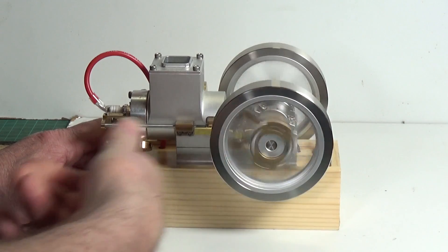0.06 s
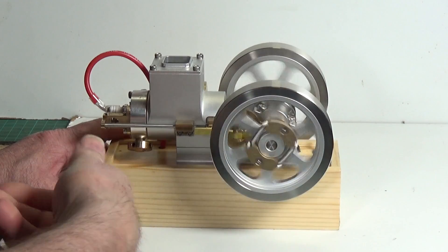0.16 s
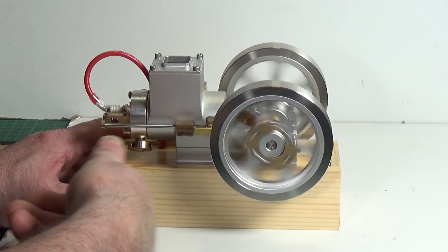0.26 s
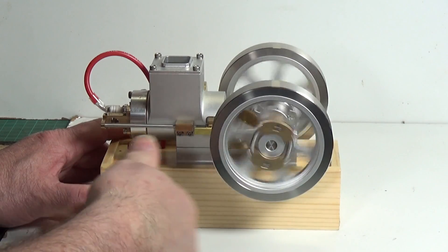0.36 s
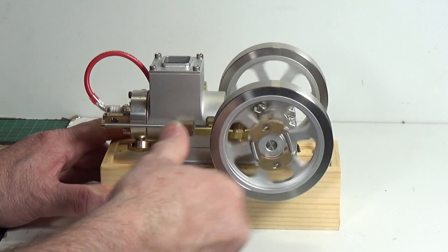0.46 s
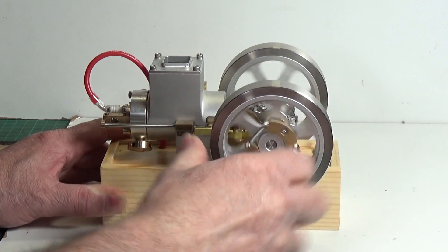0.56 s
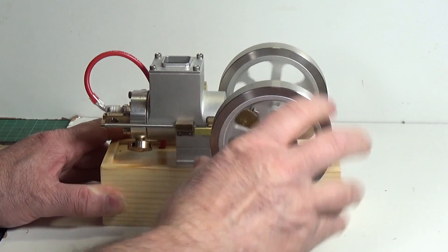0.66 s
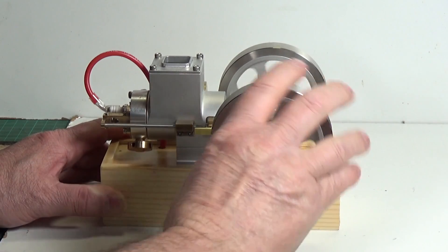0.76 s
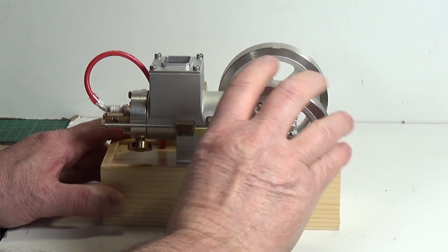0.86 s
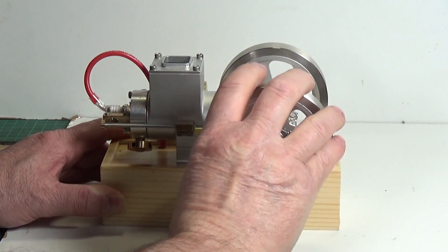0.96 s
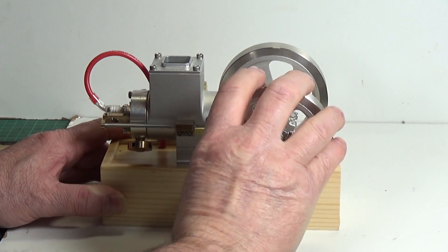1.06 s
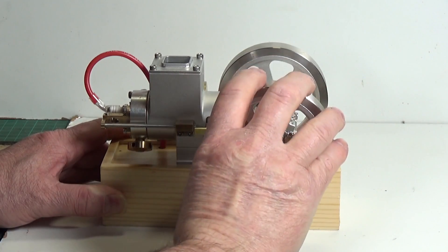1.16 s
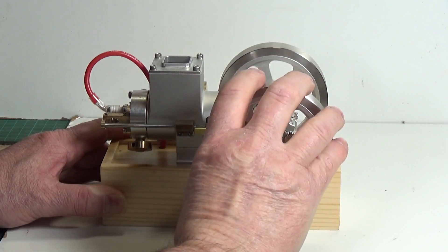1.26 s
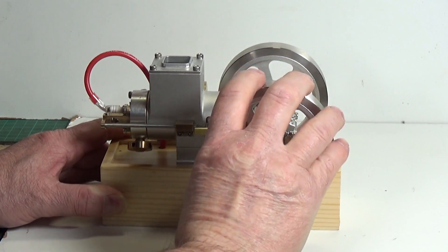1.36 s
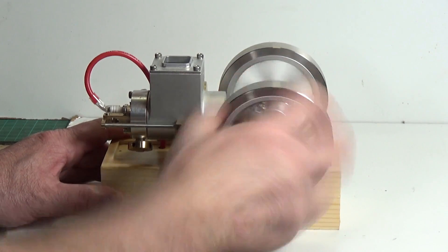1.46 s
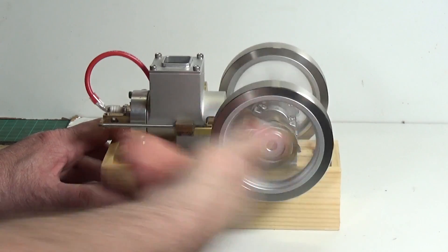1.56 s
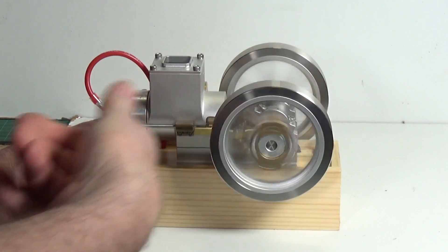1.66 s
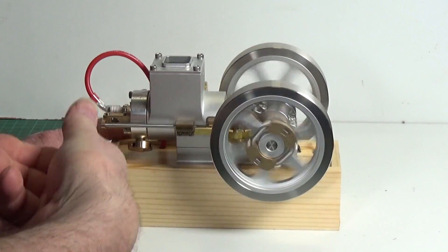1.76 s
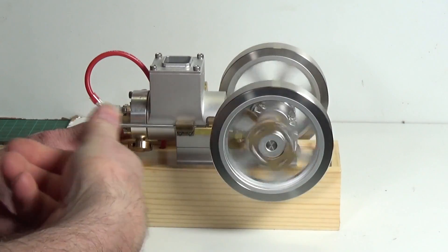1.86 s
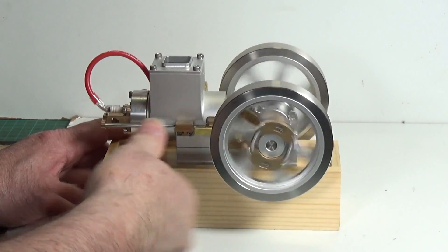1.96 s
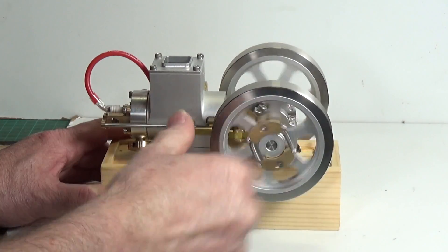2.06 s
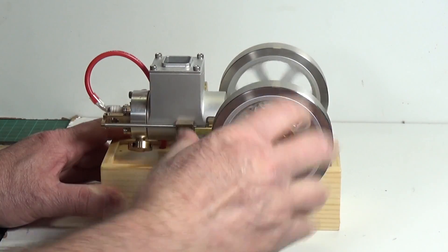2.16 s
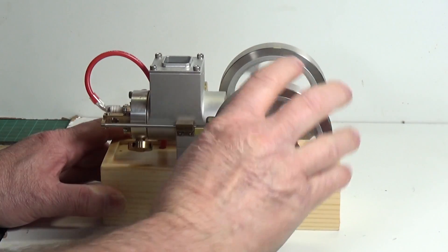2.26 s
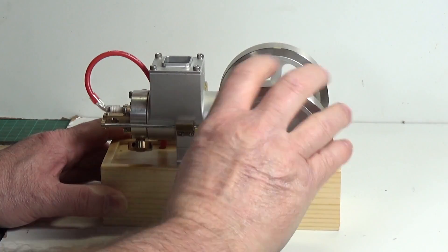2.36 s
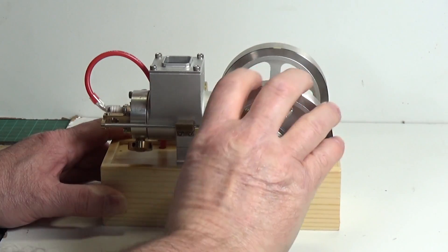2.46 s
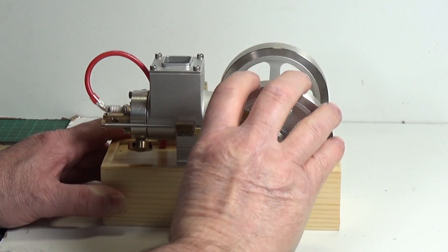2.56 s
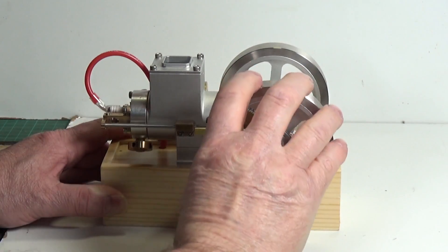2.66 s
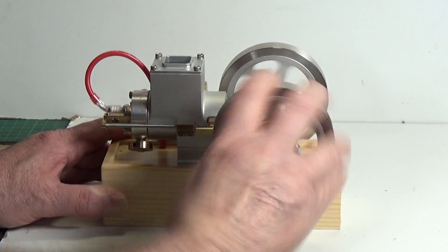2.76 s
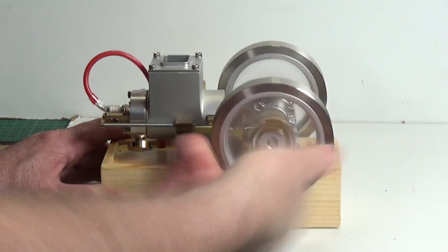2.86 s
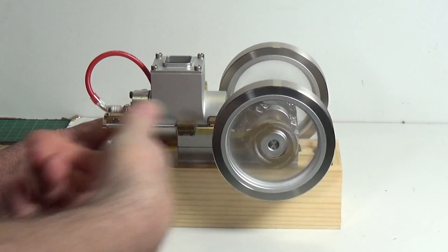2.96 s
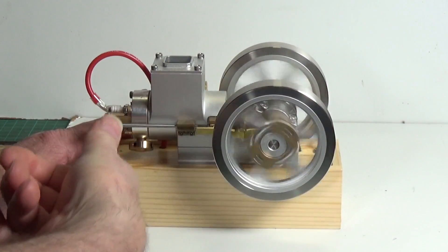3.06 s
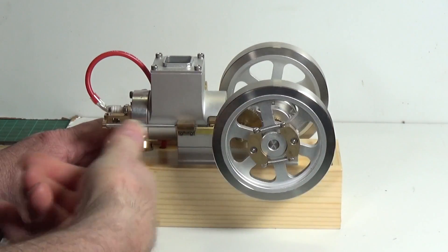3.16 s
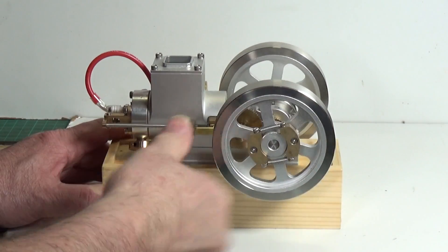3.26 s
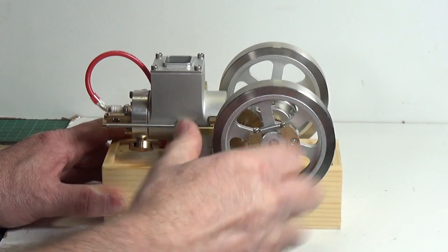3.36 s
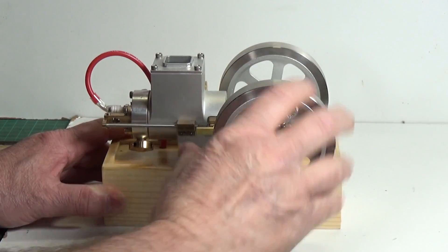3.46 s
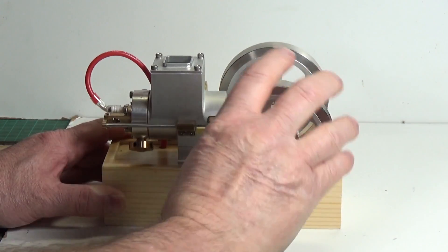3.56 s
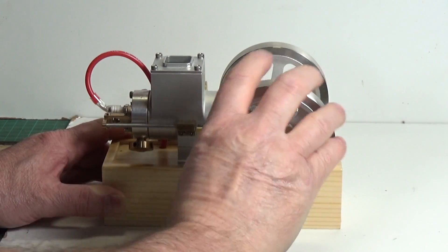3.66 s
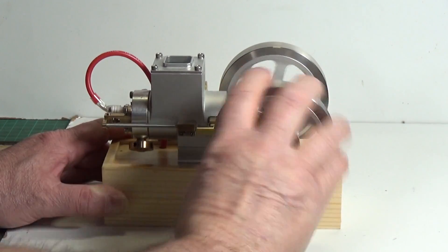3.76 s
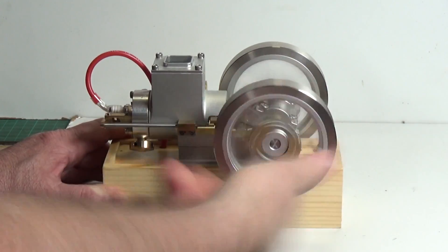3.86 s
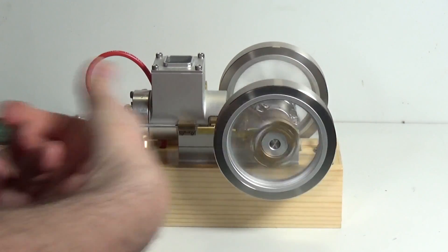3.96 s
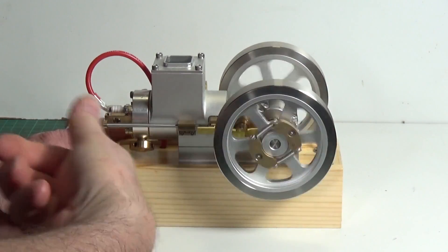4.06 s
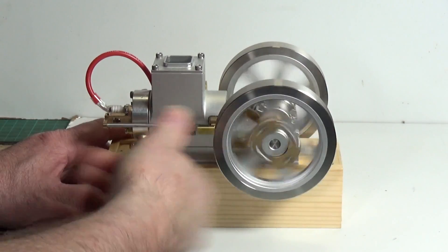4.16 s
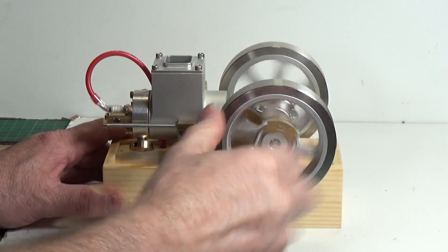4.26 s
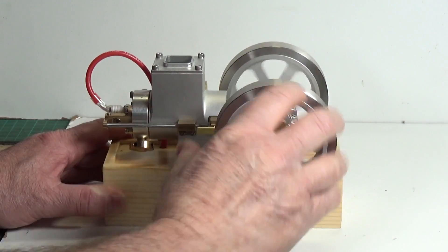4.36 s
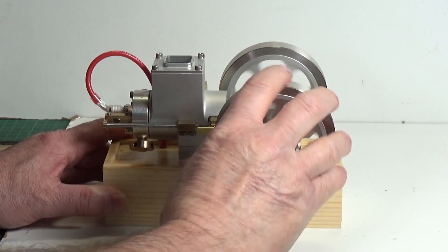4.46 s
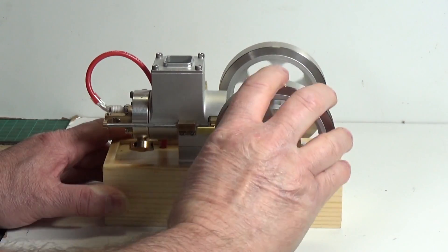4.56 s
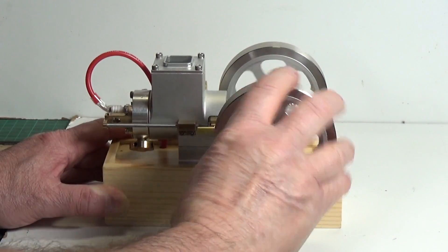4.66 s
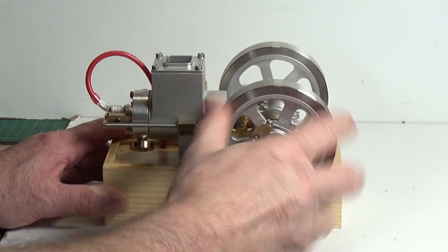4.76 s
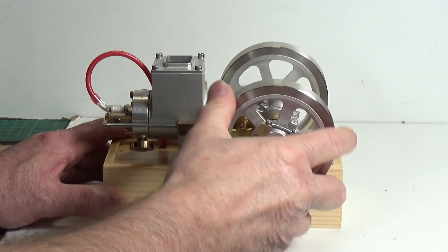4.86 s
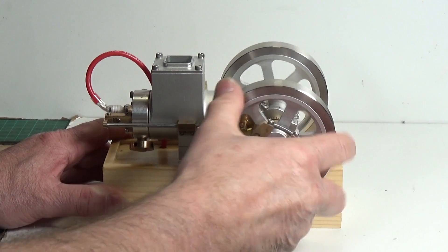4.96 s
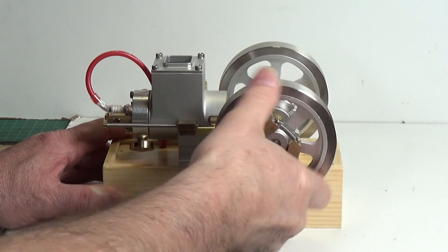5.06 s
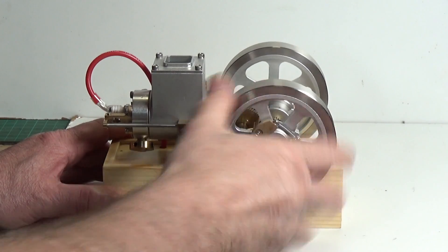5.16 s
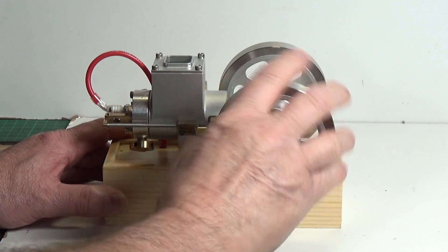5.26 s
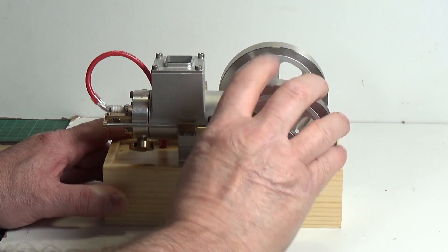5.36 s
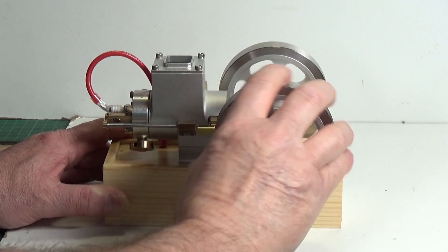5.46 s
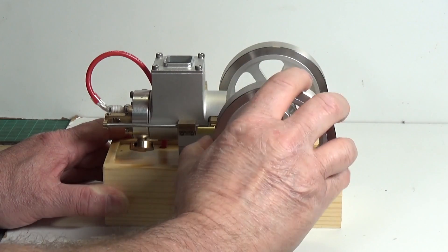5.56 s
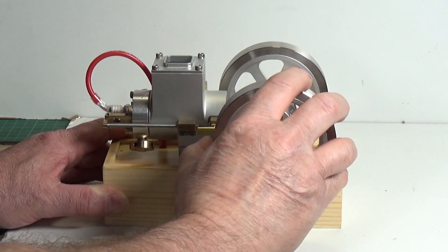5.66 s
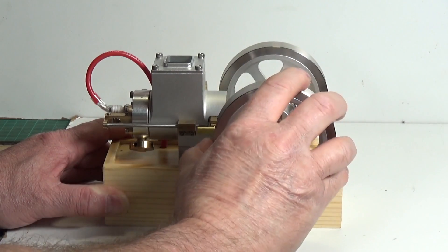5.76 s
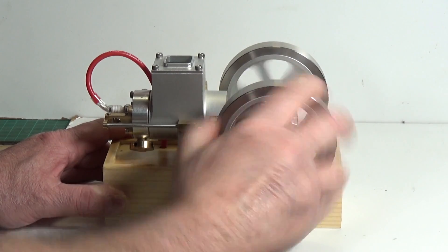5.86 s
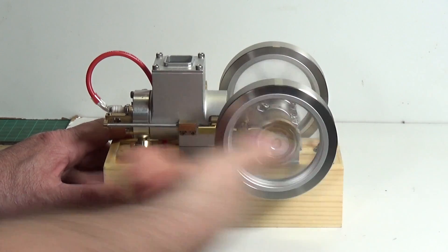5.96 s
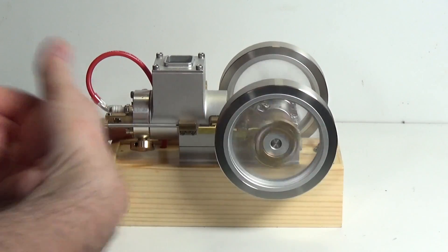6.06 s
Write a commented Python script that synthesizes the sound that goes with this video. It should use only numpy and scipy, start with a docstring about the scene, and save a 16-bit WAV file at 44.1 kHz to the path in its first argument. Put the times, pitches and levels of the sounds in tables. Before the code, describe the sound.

A small metal model engine on a wooden block is flicked over by hand again and again, each spin a short burst of knocks, clatter and valve buzz.

```python
"""A knock through a wooden box opens the rattle of a small model engine, spun by hand on its flywheel in a quiet room.
Random impacts of gear teeth and bearings ring the box and frame; cam and valve gear tick as struck resonances.
The inlet valve flutters as a buzzing tone with puffs of noise, and trapped air leaks away as resonant hiss.
Fingers scuff the wheel, whose rim sings faintly in beating sines; a low hum comes and goes under a thin whine."""
import sys
import numpy as np
from scipy import signal
from scipy.fft import rfft, irfft, next_fast_len
from scipy.io import wavfile
from scipy.ndimage import uniform_filter1d, map_coordinates

SR = 44100
rng = np.random.default_rng(int(sys.argv[2]) if len(sys.argv) > 2 else 0)


def wav_record(signal):
    """Record a signal, one row per channel, as 16-bit PCM in the file named by sys.argv[1]."""
    frames = np.transpose(np.atleast_2d(signal))
    bounded = np.clip(frames, -1, 1)
    # unit amplitude maps onto the largest positive 16-bit level
    quanta = np.round(bounded * 32767).astype(np.int16)
    wavfile.write(sys.argv[1], SR, quanta)


def undo_db(level):
    """Turn decibels back into plain size, where 20 dB means ten times bigger."""
    steps = np.asarray(level, float) / 20
    return 10 ** steps


N = 269451
TIME = np.arange(N) / SR  # seconds

# resonances of the wooden box: pitch_hz, width_hz, level_db
BOX_MODES = [(49.6, 22, -29), (132, 55, -4), (211.6, 59, -2), (248.4, 47.5, 3), (293.5, 52, -0.5),
             (411, 124, -4.5), (569, 94, 1), (637.5, 154.6, -1.5), (900, 116, -7), (988, 95, -7)]
# resonances of the metal frame: pitch_hz, width_hz, level_db
FRAME_MODES = [(1290, 100, 4), (1448, 210, 2), (1815, 213, 5.5), (1988, 295, 4.5), (2340, 520, 2),
               (2820, 1310, -3), (3700, 4100, -15)]
# colour of the air hiss at the valves: pitch_hz, relative level_db (per Hz)
HISS_COLOUR = [(2060, -7), (3500, 3), (4230, -3.5), (4820, -1), (7720, -5), (9380, -2.5), (14600, -21.5),
               (15700, -2.5)]

# spins, each playing the same cycle: valve_opens_s, slowness (1 = usual), strength_db, wheel_stopped_after_s (cycle time)
SPINS = [(0.0755, 0.998, -1, 0.6), (1.6868, 0.975, 0, 0.6), (3.0012, 0.89, 1, 0.1),
         (3.9705, 1.005, 0.5, 0.6), (6.0752, 0.95, 0.5, 0.03)]
# The cycle tables hold times at slowness 1 and levels at strength 0 dB.
# valve gear in the cycle: after_opening_s, tick_db, tick_colour_hz, frame_clack_db
CYCLE_CLICKS = [(-0.013, -16.5, 9300, -20), (0.0, -23, 6040, -13.5), (0.072, -20.5, 7650, -10),
                (0.232, -26.5, 6400, -18), (0.256, -24.5, 6500, -38), (0.311, -27.5, 6350, -17),
                (0.498, -50, 6200, -19.5)]
# knocks through the box in the cycle: after_opening_s, level_db, colour_hz
CYCLE_THUDS = [(0.071, -9, 394), (0.229, -14.5, 368), (0.315, -19, 266), (0.491, -20.5, 500)]
# ever weaker surges of the coasting wheel: after_opening_s, rise_s, length_s, box_db, frame_db
CYCLE_SURGES = [(0.184, 0.044, 0.21, -23.5, -37), (0.454, 0.037, 0.09, -32, -49)]
# inlet stroke of the cycle: after_opening_s (never stretched), length_s, buzz_db, puff_db
CYCLE_INTAKE = (0.006, 0.043, -9, -31.5)

# the hand throws or nudges the wheel: start_s, rise_s, length_s, box_db, frame_db
HAND_SURGES = [(0.0, 0.0023, 0.19, -19.5, -26), (0.69, 0.026, 0.22, -40.5, -70),
               (1.46, 0.14, 0.35, -12.5, -25.5), (2.27, 0.036, 0.16, -35.5, -52.5),
               (2.8, 0.12, 0.32, -13, -25), (3.83, 0.048, 0.26, -14.5, -25),
               (4.67, 0.025, 0.11, -43.5, -70), (4.9, 0.085, 0.43, -37, -56), (5.89, 0.12, 0.3, -15, -23)]
# other clicks of rod, gears and slack: start_s, tick_db, tick_colour_hz, frame_clack_db
OTHER_CLICKS = [(0.0509, -37, 5600, -18), (0.8612, -49, 7900, -44), (1.4212, -48, 10200, -40),
                (1.5399, -20, 9200, -18), (1.5695, -27, 8100, -13.5), (1.5883, -23, 5100, -13.5),
                (1.5978, -18, 5360, -5), (1.6204, -27, 6150, -11.5), (2.2257, -40, 9800, -37),
                (2.777, -25.5, 5050, -23.5), (2.8707, -20.5, 8600, -37), (2.8898, -25, 8130, -16.5),
                (2.9178, -28, 6800, -10.5), (2.9319, -31, 5600, -6), (3.1205, -26.5, 7860, -23),
                (3.8541, -22, 7040, -2.5), (3.8628, -17, 6300, -36), (3.8857, -22, 6100, -22),
                (3.898, -28, 6560, -6.5), (3.9193, -36, 5700, -12.5), (4.1145, -30.5, 9200, -40),
                (4.8345, -33, 8650, -32), (5.1718, -18.5, 4600, -20), (5.1844, -24.5, 5060, -33),
                (5.453, -30, 5860, -43), (5.885, -53, 5200, -33), (5.9585, -21, 13000, -18),
                (6.018, -7, 10530, -10.5), (6.0348, -14, 7740, -4), (6.0924, -8, 15000, -16)]
# other thuds through the wooden box: start_s, level_db, colour_hz
OTHER_THUDS = [(0.004, -5, 570), (0.207, -17.5, 474), (0.265, -21, 387), (0.286, -16, 730),
               (0.722, -28, 565), (0.772, -27, 302), (0.907, -20.5, 296), (1.117, -33.5, 570),
               (1.42, -24, 228), (1.511, -18.5, 600), (1.548, -1, 610), (1.59, -6, 746), (1.597, 0, 420),
               (1.895, -21, 641), (1.94, -22, 300.5), (2.031, -18.5, 246.8), (2.284, -24, 315),
               (2.318, -23, 293), (2.454, -24, 264), (2.775, -26, 416), (2.868, -11.5, 620),
               (2.906, -1.5, 635), (2.933, -8.5, 556), (2.983, -10, 260), (3.899, -3.5, 621),
               (4.684, -28, 272), (4.847, -18.5, 560), (5.158, -13.5, 305), (5.214, -25, 570),
               (5.445, -10.5, 603), (5.883, -12.5, 276), (5.955, -12, 580), (6.022, -2.5, 577)]
# inlet strokes while the hand still pulls: start_s, length_s, buzz_db, puff_db
HAND_INTAKES = [(2.802, 0.059, -60, -33), (3.858, 0.039, -12.5, -33), (5.95, 0.04, -44, -28.5)]
# faint box rattle between the surges: time_s, level_db
IDLE_RATTLE = [(0.0, -29), (0.85, -52.5), (1.05, -54), (1.4, -55), (1.6, -30), (2.3, -39.5), (2.72, -47),
               (3.2, -41.5), (3.75, -45), (4.3, -37), (4.62, -49), (5.0, -40.5), (5.85, -44.5), (6.11, -50)]

# colour of the inlet puff: pitch_hz, relative level_db (per Hz)
PUFF_COLOUR = [(2060, -34), (3500, -6), (5860, -3.5), (6400, -6), (8170, -10), (9260, 1), (11400, -8),
               (15700, -3)]
# the rim's close pair of modes: lower pitch_hz, upper pitch_hz
RIM_PAIR_HZ = [4695, 4730]
# the rim's high modes: pitch_hz, relative level_db
RIM_HIGH_MODES = [(8140, -2), (11553, -7), (12898, 0)]
# rim set ringing, then damped: start_s, end_s, lower_of_pair_db, upper_of_pair_db, high_modes_db
RIM_RINGS = [(0, .225, -42, -40, -72), (.255, .62, -60, -45, -78), (.645, 1, -72, -59, -86),
             (1.545, 1.69, -52, -46, -56), (2.355, 2.51, -64, -60, -67), (2.88, 2.96, -52, -49, -72),
             (3.92, 3.96, -52, -49, -72), (4.015, 4.19, -55, -46, -70), (4.25, 4.55, -63, -59, -80),
             (4.74, 5.0, -70, -66, -78), (5.07, 5.17, -53, -54, -65), (5.19, 5.4, -64, -61, -69),
             (5.965, 6.11, -39, -34, -54)]
# fingers brush the wheel: start_s, level_db, scuff_decay_s
TOUCHES = [(0.8945, -36, 0.041), (1.467, -34, 0.14), (2.628, -33.5, 0.063), (3.219, -37, 0.042),
           (3.797, -32, 0.051), (4.39, -35, 0.038), (4.957, -33.5, 0.02), (5.549, -36, 0.076)]
# leaks of trapped air: start_s, end_s, lower_resonances_db, upper_resonances_db
LEAKS = [(3.13, 3.852, -45, -49), (5.373, 5.85, -52.5, -64)]
# lower resonances of the leaking gap: pitch_hz, width_hz, relative level_db
GAP_LOW_MODES = [(1930, 380, 2.5), (6400, 3200, -16.5), (8460, 160, -5)]
# upper resonances of the leaking gap: pitch_hz, width_hz, relative level_db
GAP_HIGH_MODES = [(9360, 250, 10), (10900, 250, 5), (11900, 300, 1), (14100, 250, 3), (15000, 250, -2)]

# time for the room's answer to die by 60 dB: pitch_hz, decay_s
ROOM_DECAY = [(150, 0.38), (1000, 0.09), (4000, 0.12), (14000, 0.039)]
# colour of the room tone: pitch_hz, relative level_db (per Hz)
QUIET_COLOUR = [(15, -36), (25, 8), (53, -21), (119, 12), (342, -21), (424, -17), (485, -49), (746, -6),
                (809, -35), (901, -44), (2080, -17), (3470, -25), (15700, -26.5)]
# course of the low hum: time_s, level_db
HUM_LEVEL = [(0.0, -64), (0.46, -54), (0.92, -46), (1.48, -57), (1.77, -42), (2.86, -39), (3.03, -32.5),
             (3.33, -32.5), (3.66, -43.5), (5.53, -55.5), (6.11, -43)]

# Shape of a surge; the release adds to the sag.
RISE_DB, SAG_DB_PER_S, RELEASE_DB_PER_S = 24, 54.5, 367
# The valve hiss swings wider than the frame and lingers.
AIR_DB, AIR_DB_PER_FRAME_DB, AIR_RELEASE_DB_PER_S = 5, 1.5, 63
# Every thud leaves box and frame rattling briefly: box against the thud, fall, frame against the box.
SHAKE_DB, SHAKE_DB_PER_S, SHAKE_FRAME_DB = -12, 214, -19
# Idle frame against idle box; idle hiss offset and its dB per dB of box rattle.
IDLE_FRAME_DB, IDLE_AIR_DB, IDLE_AIR_FOLLOWS = -11, -43, 0.37
CLACK_HZ, CLACK_DB_PER_OCTAVE = 2160, -5.5  # a clack favours the frame modes near this pitch
FLUTTER_HZ = 209.7  # at the start of a stroke
RING_DB_PER_S = 30
SQUEAK_HZ = 2225
LEAK_LOW_DB_PER_S, LEAK_HIGH_DB_PER_S = 10.5, 50
QUIET_DB = -50
WHINE_HZ, WHINE_DB = 15640, -76
TOP_HZ = 15800


def running():
    """Teeth and bearings shake box and frame; jingle follows the square of the frame gain; air hisses at the valves."""
    box, frame, air, faint = shaking()
    teeth = chatter(rate=250, spread_db=3.5, smooth=0.71, size=24)
    slack = chatter(rate=350, spread_db=3.5, smooth=0.5, size=7)
    loose = chatter(rate=370, spread_db=18, smooth=0.2, size=3)
    wood = box * undo_db(0.8 * wobble(30)) * unit(resonant(teeth, BOX_MODES))
    metal = frame * undo_db(1.2 * wobble(40)) * unit(resonant(slack + 0.43 * teeth, FRAME_MODES))
    loose_ring = resonant(loose, [(4670, 1400, -0.76), (6400, 1300, 2.9), (9200, 320, -2.3)])
    jingle = frame ** 2 * undo_db(13.5) * unit(loose_ring)
    valve_hiss = air * undo_db(wobble(54)) * patchy(coloured(HISS_COLOUR), patchy_db=5.5)
    return wood + metal + jingle + valve_hiss + faint * coloured(HISS_COLOUR)


def shaking():
    """Gains of box rattle, frame rattle, valve hiss and the faint even hiss under it, summed as powers."""
    _, knocks, surges, _ = cycles()
    idle_db = np.interp(TIME, *np.transpose(IDLE_RATTLE))
    box, frame, air = undo_db(idle_db), undo_db(idle_db + IDLE_FRAME_DB), np.zeros(N)
    for start, rise, length, box_db, frame_db in surges:
        peak, end = start + rise, start + length
        shape = surge(start, peak, end, RELEASE_DB_PER_S)
        box = np.hypot(box, undo_db(box_db + shape))
        frame = np.hypot(frame, undo_db(frame_db + shape))
        air_shape = surge(start, peak, end, AIR_RELEASE_DB_PER_S)
        air = np.hypot(air, undo_db(AIR_DB + AIR_DB_PER_FRAME_DB * frame_db + air_shape))
    for start, level_db, _ in knocks:
        fall_db = SHAKE_DB_PER_S * np.abs(TIME - start)
        shake = (TIME > start) * undo_db(level_db + SHAKE_DB - fall_db)
        box = np.hypot(box, shake)
        frame = np.hypot(frame, undo_db(SHAKE_FRAME_DB) * shake)
    return box, frame, air, undo_db(IDLE_AIR_FOLLOWS * idle_db + IDLE_AIR_DB)


def surge(start, peak, end, release):
    """dB shape of a burst of motion: a rise to the peak, a slow sag, then a release."""
    rise = RISE_DB * np.minimum(TIME - peak, 0) / (peak - start)
    lead_in = RELEASE_DB_PER_S * np.maximum(start - TIME, 0)
    sag = SAG_DB_PER_S * np.maximum(TIME - peak, 0)
    return rise - lead_in - sag - release * np.maximum(TIME - end, 0)


def cycles():
    """The engine cycle's clicks, thuds, surges and inlet strokes laid out for every spin, with the other events."""
    ticks, knocks = list(OTHER_CLICKS), list(OTHER_THUDS)
    surges, intakes = list(HAND_SURGES), list(HAND_INTAKES)
    intake_after, intake_length, buzz_db, puff_db = CYCLE_INTAKE
    for opens, slow, db, stop in SPINS:
        for after, tick_db, hz, clack_db in CYCLE_CLICKS:
            if after < stop:
                ticks.append((opens + slow * after, tick_db + db, hz, clack_db + db))
        for after, level_db, hz in CYCLE_THUDS:
            if after < stop:
                knocks.append((opens + slow * after, level_db + db, hz))
        for after, rise, length, box_db, frame_db in CYCLE_SURGES:
            if after < stop:
                surges.append((opens + slow * after, slow * rise, slow * length, box_db + db, frame_db + db))
        intakes.append((opens + intake_after, slow * intake_length, buzz_db + db, puff_db + db))
    return ticks, knocks, surges, intakes


def thuds():
    """Soft blows ring the box; the spot struck favours the modes near its pitch."""
    out, t = np.zeros(N + SR), np.arange(SR // 5) / SR
    mode_hz = np.transpose(BOX_MODES)[0]
    for start, level_db, hz in cycles()[1]:
        burst = rng.standard_normal(len(t)) * undo_db(-60 * t / 0.005)
        force = np.convolve(burst, np.hanning(32))[:len(t)]
        favour_db = -9 * abs(np.log2(mode_hz / hz))
        out[round(start * SR):][:len(t)] += undo_db(level_db) * struck(BOX_MODES, favour_db, force)
    return out[:N]


def clicks():
    """Metal on metal: a bright tick, and a clack in the frame with a short rattle behind it."""
    out, t = np.zeros(N + SR), np.arange(SR // 8) / SR
    favour_db = CLACK_DB_PER_OCTAVE * abs(np.log2(np.transpose(FRAME_MODES)[0] / CLACK_HZ))
    for start, tick_db, tick_hz, clack_db in cycles()[0]:
        noise = rng.standard_normal(len(t))
        tick_force = noise * (undo_db(-60 * t / 0.0079) + 0.22 * undo_db(-60 * t / 0.06))
        tick = resonant(tick_force, [(tick_hz, 500, 0), (10000, 10000, -11)])
        burst = noise * (undo_db(-60 * t / 0.017) + 0.43 * undo_db(-60 * t / 0.065))
        force = np.convolve(burst, np.hanning(9))[:len(t)]
        uneven_db = 3.3 * noise[:len(FRAME_MODES)]  # each clack excites the modes differently
        clack = struck(FRAME_MODES, favour_db + uneven_db, force)
        out[round(start * SR):][:len(t)] += undo_db(tick_db) * tick / np.abs(tick).max() + undo_db(clack_db) * clack
    return out[:N]


def struck(modes, favour_db, force):
    """A blow of peak 1 that favours some modes over others."""
    ring = resonant(force, [(hz, w, db + more) for (hz, w, db), more in zip(modes, favour_db)])
    return ring / np.abs(ring).max()


def flutter():
    """The spring-loaded inlet valve buzzes on its seat while air is drawn past it."""
    buzz, draught = np.zeros(N + SR), np.zeros(N + SR)
    for start, length, buzz_db, puff_db in cycles()[3]:
        t = np.arange(round(3 * length * SR)) / SR
        turn = 2 * np.pi * FLUTTER_HZ * t * (1 - 0.11 * t)  # slows through the stroke
        rise = 1 - np.exp(-t / 0.009)
        tone = np.sin(turn) + 0.43 * np.sin(2 * turn + 0.23) + 0.073 * np.sin(3 * turn + 0.97)
        buzz[round(start * SR):][:len(t)] += undo_db(buzz_db) * rise * np.exp(-(t / (0.83 * length)) ** 3) * tone
        puff = rise * np.exp(-(t / length) ** 5) * (1 + 0.22 * np.sin(turn))
        draught[round(start * SR):][:len(t)] += undo_db(puff_db) * puff
    return buzz[:N] + draught[:N] * patchy(coloured(PUFF_COLOUR), patchy_db=7.0)


def touches():
    """Skin drags briefly on metal: a soft scuff that opens with a short squeak."""
    out, t = np.zeros(N + SR), np.arange(SR // 4) / SR
    for start, level_db, decay in TOUCHES:
        squeak = resonant(rng.standard_normal(len(t)), [(SQUEAK_HZ, 220, 0)])
        squeak = unit(resonant(squeak, [(SQUEAK_HZ, 600, 0)])) * np.exp(-t / 0.02)
        scuff = resonant(rng.standard_normal(len(t)), [(1679, 1060, 0)])
        scuff = 0.6 * unit(resonant(scuff, [(1704, 1200, 0)])) * np.exp(-t / decay)
        rise = 1 - np.exp(-t / 0.0047)
        out[round(start * SR):][:len(t)] += undo_db(level_db) * rise * (squeak + scuff)
    return out[:N]


def rim():
    """The rim's long modes sing when rubbed or knocked; the close pair beats."""
    level = np.zeros((3, N))
    for start, end, *mode_db in RIM_RINGS:
        age = np.clip(TIME - start, 0, None)
        attack = np.clip(age / 0.0021, 0, 1)
        damping = np.clip((end - TIME) / 0.0086 + 1, 0, 1)
        level += undo_db(mode_db)[:, None] * undo_db(-RING_DB_PER_S * age) * attack * damping

    def mode(hz):
        """A sine unsteady in level and phase."""
        return undo_db(2.2 * wobble(30)) * np.sin(2 * np.pi * hz * TIME + 0.35 * wobble(36))

    pair = level[0] * mode(RIM_PAIR_HZ[0]) + level[1] * mode(RIM_PAIR_HZ[1])
    return pair + level[2] * sum(undo_db(db) * mode(hz) for hz, db in RIM_HIGH_MODES)


def leak():
    """Compressed air seeps past the piston and whistles faintly in the gap; the top fades first as pressure falls."""
    low, high, air = np.zeros(N), np.zeros(N), rng.standard_normal(N)
    for start, end, low_db, high_db in LEAKS:
        age = np.clip(TIME - start, 0, None)
        flow = np.clip(age / 0.017, 0, 1) * np.clip((end - TIME) / 0.065, 0, 1)
        low += flow * undo_db(low_db - LEAK_LOW_DB_PER_S * age)
        high += flow * undo_db(high_db - LEAK_HIGH_DB_PER_S * age)
    return low * unit(resonant(air, GAP_LOW_MODES)) + high * unit(resonant(air, GAP_HIGH_MODES))


def room(x):
    """The room answers with a noise tail in which each frequency dies at its own speed."""
    hz, t, z = signal.stft(rng.standard_normal(SR // 2), SR, nperseg=256)
    fading = z * undo_db(-60 * t / along(ROOM_DECAY, hz)[:, None])
    tail = signal.istft(fading, SR, nperseg=256)[1]
    delayed = np.pad(x, (300, 0))  # samples before the first reflection
    return signal.fftconvolve(delayed, tail / np.linalg.norm(tail))[:N]


def background():
    """Room tone as coloured noise, a wavering low hum and a thin steady whine."""
    hum_gain = undo_db(np.interp(TIME, *np.transpose(HUM_LEVEL), -120, -120))
    hum = np.sin(2 * np.pi * 57.6 * TIME + 0.81 * wobble(3.06)) * undo_db(0.97 * wobble(4.45)) * hum_gain
    whine = undo_db(WHINE_DB) * unit(resonant(rng.standard_normal(N), [(WHINE_HZ, 70, 0)]))
    return undo_db(QUIET_DB) * coloured(QUIET_COLOUR) + hum + whine


def chatter(rate, spread_db, smooth, size):
    """Random small impacts (rate per second, size samples long), some harder than most, with smooth rubbing."""
    when, strength = rng.random(N), np.minimum(rng.standard_exponential(N), 3.5)
    rub = rng.standard_normal(N)
    hits = (when < rate / SR) * undo_db(spread_db * strength) * np.sign(rub)
    return np.convolve(unit(hits) + smooth * rub, np.hanning(size), "same")


def patchy(x, patchy_db):
    """x with random louder and softer patches in time and pitch, at rms 1."""
    z = signal.stft(x, nperseg=256)[2]
    field = uniform_filter1d(rng.standard_normal(z.shape), size=4, axis=0)
    field = uniform_filter1d(field, size=6, axis=1)
    return unit(signal.istft(z * undo_db(patchy_db * unit(field)), nperseg=256)[1][:N])


def coloured(spectrum):
    """Noise of rms 1 with the given spectrum."""
    return unit(filtered(rng.standard_normal(N), lambda hz: undo_db(along(spectrum, hz))))


def resonant(x, modes):
    """x ringing in a set of (pitch_hz, width_hz, level_db) resonances of alternating sign."""
    def response(f):
        """Sum of second-order band-passes."""
        return sum((-1) ** k * undo_db(db) * 1j * f * w / (c * c - f * f + 1j * f * w)
                   for k, (c, w, db) in enumerate(modes))
    return filtered(x, response)


def filtered(x, response):
    """x times a complex response of frequency."""
    m = next_fast_len(len(x) + SR // 2)
    return irfft(rfft(x, m) * response(np.fft.rfftfreq(m, 1 / SR)), m)[:len(x)]


def along(points, hz):
    """(pitch_hz, value) points read on a log axis."""
    f, v = np.transpose(points)
    return np.interp(np.log(hz + 1), np.log(f + 1), v)


def wobble(rate):
    """A smooth random curve, rate knots a second."""
    return map_coordinates(rng.standard_normal(int(N * rate / SR) + 4), [np.arange(N) * rate / SR])


def unit(x):
    """Scaled to rms 1."""
    return x / np.sqrt(np.mean(x ** 2) + 1e-20)


def scene():
    """Engine, room and background on one microphone."""
    engine = running() + thuds() + clicks() + flutter() + touches() + rim() + leak()
    return (engine + undo_db(-13) * room(engine) + background())[None]


def roll_off(x):
    """The treble ends steeply here."""
    return signal.sosfilt(signal.butter(12, 16510, fs=SR, output="sos"), x)


def record(dry):
    """The microphone loses the very top, and the loudest peaks round off towards full scale."""
    dull = filtered(dry[0], lambda hz: np.where(hz < TOP_HZ, 1, undo_db(-26)))[None]
    mix = dull / (1 + np.abs(dull) ** 8) ** (1 / 8)
    return roll_off(mix)


dry = scene()
out = record(dry)
wav_record(out)
```